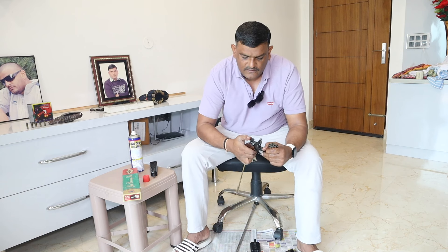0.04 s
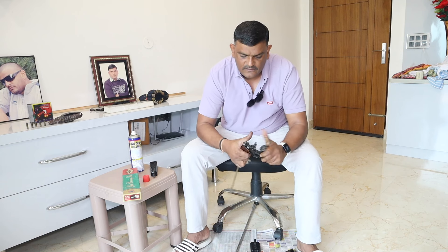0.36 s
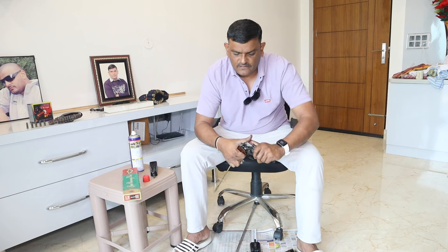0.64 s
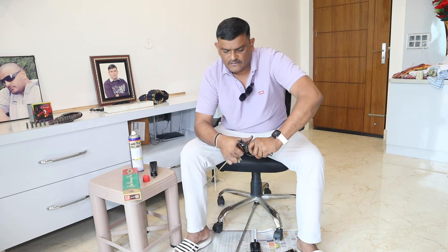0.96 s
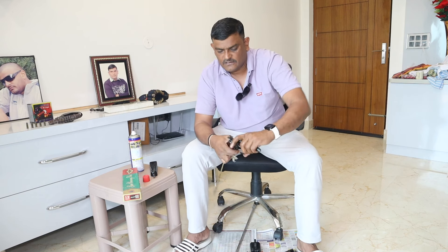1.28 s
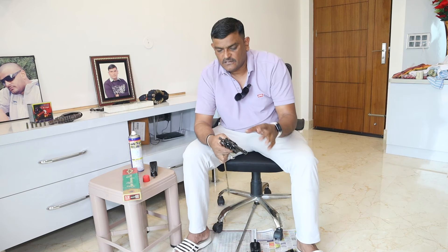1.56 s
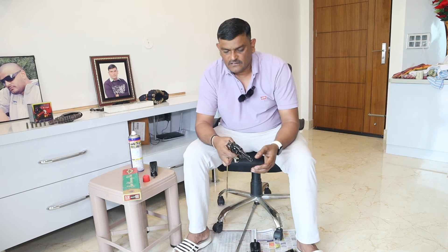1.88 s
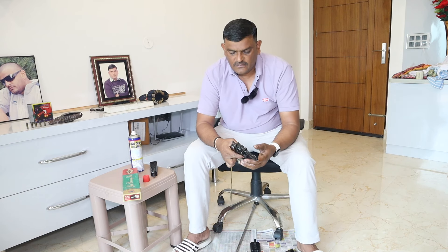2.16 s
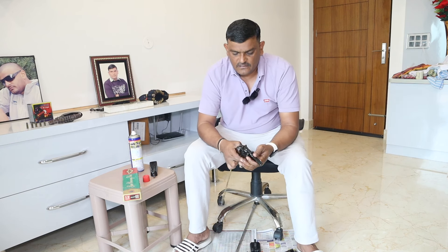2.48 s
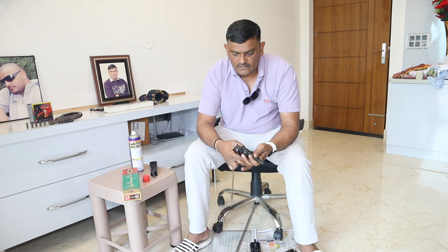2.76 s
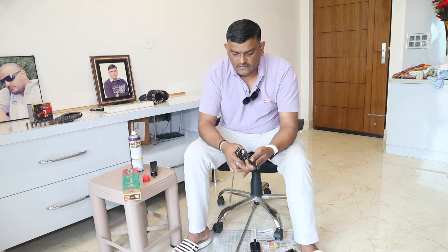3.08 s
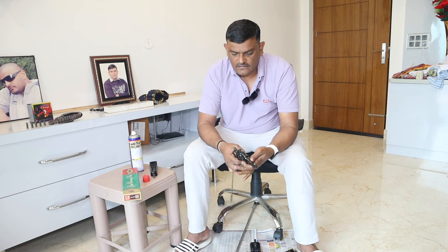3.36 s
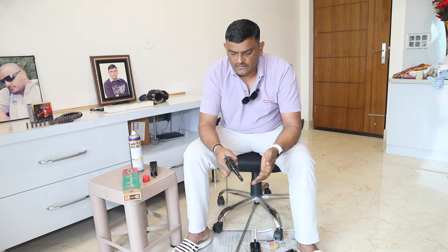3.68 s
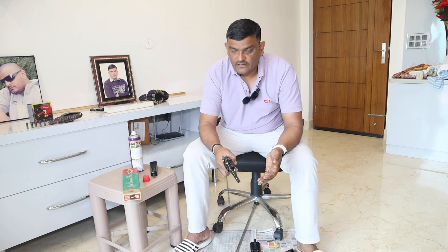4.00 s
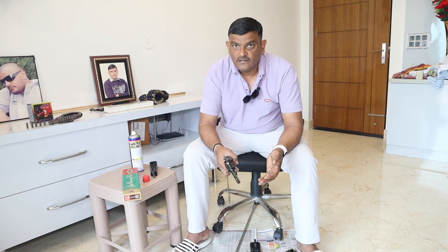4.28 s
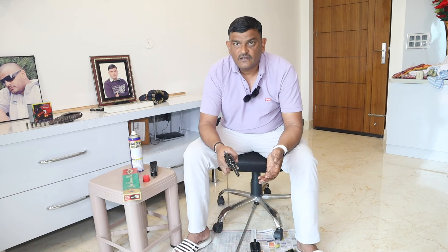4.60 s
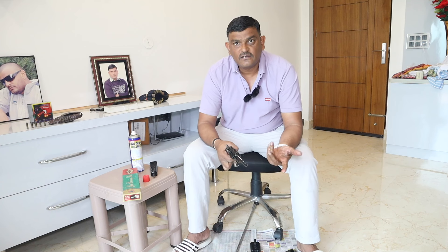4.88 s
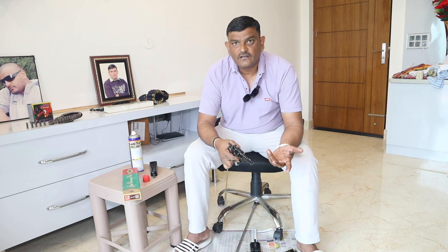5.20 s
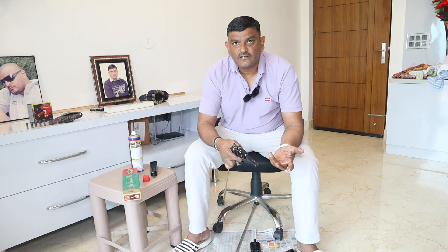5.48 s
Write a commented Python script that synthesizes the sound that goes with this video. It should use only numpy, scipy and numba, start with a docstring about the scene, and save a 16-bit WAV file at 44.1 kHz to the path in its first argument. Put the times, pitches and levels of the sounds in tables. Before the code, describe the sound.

A revolver's cylinder is unlatched and snapped shut, then the trigger is pulled seven times with sharp, empty metal clicks.

```python
"""Sharp steel clicks echo in a hard-walled room: a revolver's cylinder is unlatched and snapped shut,
then the trigger is pulled seven times on empty chambers (cylinder stop, hammer fall, trigger return).
Each impact excites the modes of the steel, which the hand damps at once; springs ring, fingers rub.
A close microphone feeds the left channel; its limiter ducks at each blow, so the echo swells up
afterwards. The right channel carries only the bass of the left and a faint noise of its own."""
import sys
import numpy as np
from scipy import signal
from scipy.fft import rfft, irfft
from scipy.io import wavfile
from scipy.ndimage import uniform_filter1d
from numba import njit

SR = 44100
rng = np.random.default_rng(int(sys.argv[2]) if len(sys.argv) > 2 else 0)


def int16_out(signal):
    """Quantize to a 16-bit WAV file."""
    q = np.round(np.clip(np.atleast_2d(signal).T, -1, 1) * 32767)
    wavfile.write(sys.argv[1], SR, q.astype(np.int16))


N = 244386
LEAD = SR // 4  # samples mixed before time zero

# trigger pulls: stop_s, blow_s, return_s, finger_force_db, blow_db, thud_re_blow_db, chamber_pitch_hz
TRIGGER_PULLS = [(2.9887, 3.0162, 3.2215, 0, 26, -30, 4400), (3.393, 3.4209, 3.6090, -1, 24, -35, 4400),
                 (3.7730, 3.8019, 3.9870, -2, 23.5, -22.5, 4050),
                 (4.131, 4.1622, 4.3435, -3.5, 21.5, -41, 3140),
                 (4.496, 4.5414, 4.7215, -5.5, 22.5, -35, 4960),
                 (4.887, 4.9222, 5.0895, -5, 20.5, -36, 3950), (5.254, 5.2848, 5.4630, -6.5, 19, -27, 3900)]
# impact spectra of cylinder stop, hammer and trigger: frequency_hz, level_db
STOP_SPECTRUM = [(100, -28), (1500, -28), (2200, -35), (2800, -33), (3900, -1), (4400, -16), (5000, 0),
                 (5700, 0), (6600, -24), (7600, -9.5), (8800, -7.5), (10500, -13.5), (15500, -19)]
HAMMER_SPECTRUM = [(100, -28), (600, -28.5), (850, -11.5), (1200, -22), (1500, -10.5), (1750, -10.5),
                   (2300, -7), (3300, -1), (4050, 3.5), (4700, -1), (6500, 1), (8500, -4), (11500, -9.5),
                   (15500, -12.5)]
TRIGGER_SPECTRUM = [(100, -57), (600, -19), (1200, -20), (1900, -13.5), (2300, -5.5), (2800, -4),
                    (3500, -3.5), (5100, 1), (6200, -4.5), (7000, -3.5), (9000, -8.5), (12000, -9.5),
                    (15500, -21)]

def trigger_action():
    """A chain of impacts: each pull locks the cylinder and drops the hammer; the trigger springs back."""
    mix = np.zeros(LEAD + N)
    for stop_s, blow_s, return_s, force_db, blow_db, thud_db, pitch_hz in TRIGGER_PULLS:
        # the pawl meets the ratchet, then the stop drops; both follow the finger force
        add(mix, stop_s - 0.0325, tick(force_db - 21.5, treble_db=2))
        add(mix, stop_s, click(STOP_SPECTRUM, force_db - 0.5, t60_s=0.017, rise_s=0.00021,
                               ring_db=-2.5, pitch_hz=5170, favour_db=3))
        # each fall has its own strength and pitch: the sear lets go, the hammer touches, then lands
        add(mix, blow_s - 0.0061, click(TRIGGER_SPECTRUM, -7, t60_s=0.035, ring_db=-12))
        touch = click(HAMMER_SPECTRUM, 13.5, t60_s=0.0077, treble_db=0.6, ring_db=-12.5)
        add(mix, blow_s - 0.0017, touch)
        blow = click(HAMMER_SPECTRUM, blow_db, t60_s=0.02, treble_db=0.6,
                     ring_db=-7, pitch_hz=pitch_hz, favour_db=11.5)
        add(mix, blow_s, blow + thud(blow_db + thud_db))
        rebound = click(TRIGGER_SPECTRUM, force_db + 2.5, t60_s=0.022, ring_db=-16, pitch_hz=2470)
        add(mix, return_s, rebound)
        seating = click(TRIGGER_SPECTRUM, 0.15 * force_db - 2.3, t60_s=0.029, ring_db=-2, pitch_hz=5360)
        add(mix, return_s + 0.0023, seating)
    return mix


# snaps of latch and crane: start_s, level_db, seat_delay_s, seat_db, treble_db, thud_re_level_db
LATCH_SNAPS = [(-.1, -4.5, .002, 1.5, 3.5, -28), (0.562, -6.5, 0.0026, -13, -2.5, -17.5),
               (.9500, -5.5, .0012, -6.5, -2, -16), (0.9633, 5, 0.001022, 13.5, 3, -40),
               (2.0921, -2.5, .002, -1, -1.5, -27.5)]
# the cylinder swung shut: start_s, level_db, thud_re_level_db
CYLINDER_SLAMS = [(1.8495, 25.5, -13)]
# impact spectra of snap and slam: frequency_hz, level_db
SNAP_SPECTRUM = [(100, -27), (600, -15), (850, -20), (1150, -17), (1700, -16.5), (2300, -3), (2800, -4),
                 (3900, -1.5), (4600, -2), (6000, -1.5), (7800, -4), (10000, -9), (15500, -16.5)]
SLAM_SPECTRUM = [(40, -29), (200, -26), (600, -17), (850, -15.5), (1200, -20), (2200, -6.5), (3000, -2),
                 (3900, 4), (4600, -1), (6000, 2), (7800, 1.5), (10000, -6.5), (15500, -13)]

def cylinder():
    """Double impacts: the latch snaps, then seats; it rides over the cylinder, which then slams home."""
    def snap(db, treble_db, thud_db, t60_s=0.022):
        return click(SNAP_SPECTRUM, db, t60_s, treble_db, ring_db=-12) + thud(db + thud_db)

    mix = np.zeros(LEAD + N)
    for start_s, db, seat_delay_s, seat_db, treble_db, thud_db in LATCH_SNAPS:
        add(mix, start_s, snap(db, treble_db, thud_db))
        add(mix, start_s + seat_delay_s, snap(seat_db, treble_db, thud_db, t60_s=0.02))
    for start_s, db, thud_db in CYLINDER_SLAMS:
        add(mix, start_s - 0.006, snap(-3, treble_db=2.5, thud_db=-8.5))
        slam = click(SLAM_SPECTRUM, db, t60_s=0.023, rise_s=0.0002, ring_db=-13)
        add(mix, start_s, slam + thud(db + thud_db))
    return mix


# modes of the steel frame and cylinder: frequency_hz, level_db, t60_s
STEEL_MODES = [(2468, -16, 0.031), (3050, -10.5, 0.03), (3870, -0.5, 0.0096), (4400, -16.5, 0.015),
               (5038, 4.5, 0.016), (5340, 1.5, 0.023), (6560, -13.5, 0.048), (7070, 5, 0.015),
               (8650, 4.5, 0.0063), (11680, -11, 0.018)]

def click(colour, db, t60_s, treble_db=0, rise_s=0.00012, ring_db=-8, pitch_hz=3950, favour_db=2):
    """Impulse excitation: steel on steel gives a crack of crowded, damped modes and a brief ring."""
    t = np.arange(2048) / SR
    onset = 1 - np.exp(-t / rise_s)
    envelope = onset * decay(t, t60_s)
    gain = spectrum(colour, len(t), treble_db)
    crack = noise(colour, len(t)) * envelope
    for _ in range(2):
        # a sharp blow excites the modes fairly evenly: mostly their phases are left to chance
        crack = irfft(gain * np.exp(1j * np.angle(rfft(crack))))
        crack *= envelope / np.sqrt(abs(uniform_filter1d(crack ** 2, size=64)) + 1e-14)
    # the point of impact favours modes near its own pitch, and others by chance
    hz, mode_db, mode_t60_s = np.transpose(STEEL_MODES)[:, :, None]
    chance, phase = rng.random((2, len(STEEL_MODES), 1))
    boost_db = 10 * chance + favour_db * np.exp(-(np.log(hz / pitch_hz) / 0.045) ** 2)
    modes = amp(mode_db + boost_db) * np.sin(2 * np.pi * (hz * t + phase)) * decay(t, mode_t60_s)
    ring = modes.sum(0) * onset
    impact = crack / np.linalg.norm(crack) + amp(ring_db) * ring / np.linalg.norm(ring)
    return amp(db) * impact * np.linalg.norm(envelope) / np.linalg.norm(impact)


# low modes of the gun held in the hand: frequency_hz, level_db, t60_s
GRIP_MODES = [(202, -14, 0.008), (390, -7.5, 0.013), (640, -17.5, 0.011)]

def thud(db):
    """Damped oscillation: the whole frame knocks in the hand for a few low swings."""
    t = np.arange(2048) / SR
    return sum(amp(db + mode_db) * np.cos(2 * np.pi * hz * t) * decay(t, t60_s)
               for hz, mode_db, t60_s in GRIP_MODES)


# springs set ringing by a snap: start_s, pitch_hz, level_db, t60_s
SPRING_RINGS = [(0.963, 1316, -23.5, 0.77), (2.092, 3040, -19, 0.51)]

def springs():
    """Beating: five closely spaced modes of each small spring drift in and out of phase."""
    mix, t = np.zeros(LEAD + N), np.arange(SR) / SR
    for start_s, pitch_hz, db, t60_s in SPRING_RINGS:
        modes_hz = pitch_hz * (1 + .03 * np.linspace(-1, 1, 5) + .006 * rng.standard_normal(5))
        ring = np.sin(2 * np.pi * modes_hz[:, None] * t).mean(0)
        add(mix, start_s, amp(db) * ring * decay(t, t60_s))
    return mix


# spectrum of a light contact: frequency_hz, level_db
TICK_SPECTRUM = [(30, -16), (200, -10), (1000, -12), (2000, -12), (2500, 0), (3100, -2.5), (3900, 0.5),
                 (4400, -1.5), (5000, 5), (6200, -9), (7100, -1), (9000, -12), (15500, -36)]

def tick(db, treble_db=0, pitch_hz=5020):
    """Light impact: a small part touches the frame and favours the modes near one pitch."""
    return click(TICK_SPECTRUM, db, t60_s=0.015, treble_db=treble_db, rise_s=0.00027,
                 ring_db=-5, pitch_hz=pitch_hz, favour_db=9)


# the clearest ticks under the fingers: start_s, level_db, treble_db, pitch_hz
LOOSE_TICKS = [(0.4194, -23, 26, 8800), (.521, -26, 5, 8500), (0.5295, -17, 17, 3930),
               (.535, -26, 15, 2470), (.7655, -33, -7, 5290), (0.8284, -23.5, -23, 3900),
               (.945, -28, -6, 3150), (1.3836, -29.5, -8, 5200), (1.4245, -33.5, -13, 5070),
               (1.7257, -30, 3, 5020), (1.766, -31, 6, 5290), (2.544, -34.5, -5, 3950),
               (2.872, -21, -17, 3920), (2.894, -24, -28, 2470)]

def loose_parts(faint_count=12, from_s=0.5, to_s=2.95, faint_db=-40, spread_db=3):
    """Rattle: loose parts tick as the gun is turned over, the fainter ones at random times."""
    mix = np.zeros(LEAD + N)
    for start_s, db, treble_db, pitch_hz in LOOSE_TICKS:
        add(mix, start_s, tick(db, treble_db, pitch_hz))
    for slot, (when, strength, mode) in enumerate(rng.random((faint_count, 3))):
        start_s = from_s + (to_s - from_s) * (slot + when) / faint_count
        pitch_hz = STEEL_MODES[int(mode * len(STEEL_MODES))][0]
        add(mix, start_s, tick(faint_db + spread_db * (2 * strength - 1), pitch_hz=pitch_hz))
    return mix


# finger slides: middle_s, length_s, level_db
FINGER_SLIDES = [(0.421, 0.099, -41), (0.491, 0.11, -47.5), (0.536, .06, -35), (2.718, 0.12, -44.5),
                 (2.954, 0.15, -43)]
# spectrum of skin on steel: frequency_hz, level_db
SLIDE_SPECTRUM = [(30, -28), (200, -1), (1500, -4), (2400, -5), (3200, -2), (4700, 1.5), (6200, -2.5),
                  (8900, -2.5), (10500, -17), (15500, -24)]

def fingers(grain_db=3.5):
    """Sliding friction: fingers on steel make a noise that turns grainy as their grip varies."""
    mix = np.zeros(LEAD + N)
    for middle_s, length_s, db in FINGER_SLIDES:
        size = round(length_s * SR)
        grip = uniform_filter1d(rng.standard_normal(size), size=90)
        slide = noise(SLIDE_SPECTRUM, size) * amp(grain_db * grip / grip.std())
        add(mix, middle_s - length_s / 2, amp(db) * slide / slide.std() * np.hanning(size))
    return mix


# reverberation time of the room: frequency_hz, t60_s
ROOM_DECAY = [(300, 0.3), (800, 0.56), (2100, 0.55), (4000, 0.64), (7000, 0.4468), (10000, 0.4),
              (15000, 0.3)]
# colour of its echo: frequency_hz, gain_db
ECHO_SPECTRUM = [(100, -41.5), (550, -24.5), (850, -8.5), (1150, -12), (1600, -8.5), (2500, -13),
                 (5000, -13), (9000, -10.5), (15000, -19.5)]

def room(x, build_s=0.021, early_db=-15, early_t60_s=0.2):
    """Reverberation: early reflections, and a diffuse field that fills and drains band by band."""
    frames = dict(fs=SR, nperseg=256, noverlap=192)
    hop_s = 64 / SR
    hz, _, bands = signal.stft(x, **frames)
    power = uniform_filter1d(abs(bands) ** 2, size=3, axis=0)
    fill = np.exp(-hop_s / build_s)
    fed = signal.lfilter([0, 0, 1 - fill], [1, -fill], power, axis=1)
    retained = decay(hop_s, curve(ROOM_DECAY, hz)) ** 2
    energy = np.array([signal.lfilter([1 - k], [1, -k], band) for k, band in zip(retained, fed)])
    diffuse = signal.stft(rng.standard_normal(len(x)), **frames)[2]
    diffuse *= np.sqrt(abs(energy)) * amp(curve(ECHO_SPECTRUM, hz))[:, None] / diffuse.std()
    tail = signal.istft(diffuse, **frames)[1][:len(x)]
    t = np.arange(4096) / SR
    early = rng.standard_normal(len(t)) * (rng.random(len(t)) < .03)  # sparse reflections
    early *= (t > .003) * decay(t, early_t60_s)
    return tail + amp(early_db) * signal.oaconvolve(x, early / np.linalg.norm(early))[:len(x)]


# spectra of the room's air and of the idle right channel: frequency_hz, level_db
AIR_SPECTRUM = [(20, -41.5), (45, -28), (80, -4.5), (130, -2), (250, -1), (430, -1), (650, -8.5),
                (1200, -13.5), (2200, -18), (5000, -17), (9000, -22.5), (15500, -26)]
IDLE_SPECTRUM = [(20, -22), (45, -44), (100, 4.5), (260, 1), (450, -8), (700, -18), (1400, -18.5),
                 (4000, -20), (15500, -22)]

def background(air_db=-50, idle_db=-58):
    """Stationary noise: the air in the room and the hiss of the idle channel."""
    return amp(air_db) * noise(AIR_SPECTRUM, N), amp(idle_db) * noise(IDLE_SPECTRUM, N)


def noise(colour, size):
    """Random phases under a given spectrum make coloured noise of rms 1."""
    gain = spectrum(colour, size)
    x = irfft(gain * np.exp(2j * np.pi * rng.random(len(gain))), size)
    return x / x.std()


def spectrum(colour, size, treble_db=0):
    """Spectral envelope: the gain of each bin, with a treble shelf around 8 kHz."""
    hz = np.fft.rfftfreq(size, 1 / SR)
    shelf = hz ** 4 / (hz ** 4 + 8000. ** 4)
    return amp(curve(colour, hz) + treble_db * shelf)


def curve(points, hz):
    """Interpolation of (frequency_hz, value) points on a log-frequency axis."""
    point_hz, value = np.transpose(points)
    return np.interp(np.log(hz + 1), np.log(point_hz + 1), value)


def decay(t, t60_s):
    """Exponential damping: the amplitude falls 60 dB in t60_s."""
    return np.exp(-np.log(1000) * t / t60_s)


def amp(db):
    """Decibels to amplitude ratio."""
    return 10 ** (np.asarray(db) / 20)


def add(mix, start_s, sound):
    """Superposition: a sound joins the mix at start_s."""
    part = mix[LEAD + round(start_s * SR):][:len(sound)]
    part += sound[:len(part)]


def scene(bleed_hz=185):
    """Low-pass crosstalk: the gun and its echo are on the left; only the bass bleeds to the right."""
    gun = cylinder() + trigger_action() + loose_parts() + fingers()
    in_room = (gun + room(gun) + springs())[LEAD:]
    air, hiss = background()
    left = in_room + air
    pole = np.exp(-2 * np.pi * bleed_hz / SR)
    right = signal.lfilter([0, 1 - pole], [1, -pole], left) + hiss
    return np.array([left, right])


@njit
def limiter(over_db, attack, release, charge, recover):
    """Gain reduction in dB: a fast stage for each blow, a slow one that builds over repeated blows."""
    cut_db, fast, slow = np.zeros(len(over_db)), 0., 0.
    for i in range(len(over_db)):
        fast = max(fast - release, slow)
        if over_db[i] > fast:
            fast += (over_db[i] - fast) * attack
        slow = max(slow + (fast - slow) * charge - recover, 0.)
        cut_db[i] = fast
    return cut_db


def record(dry, threshold_db=-2, attack_s=0.00034, release_db_per_s=155,
           charge_s=0.47, recover_db_per_s=1.0, cutoff_hz=16150):
    """Peak limiting: both channels duck together, what slips past clips, and a low-pass follows."""
    over_db = 20 * np.log10(abs(dry).max(0) + 1e-9) - threshold_db
    cut_db = limiter(over_db, 1 / (attack_s * SR), release_db_per_s / SR,
                     1 / (charge_s * SR), recover_db_per_s / SR)
    clipped = np.clip(dry * amp(-cut_db), -1, 1)
    lowpass = signal.firwin(255, cutoff_hz, window=("kaiser", 8), fs=SR)
    return signal.oaconvolve(clipped, lowpass[None], "same")


dry = scene()
out = record(dry)
int16_out(out)
```